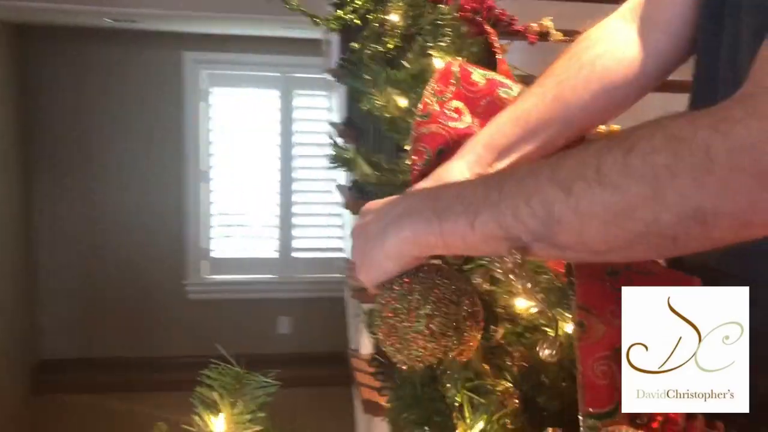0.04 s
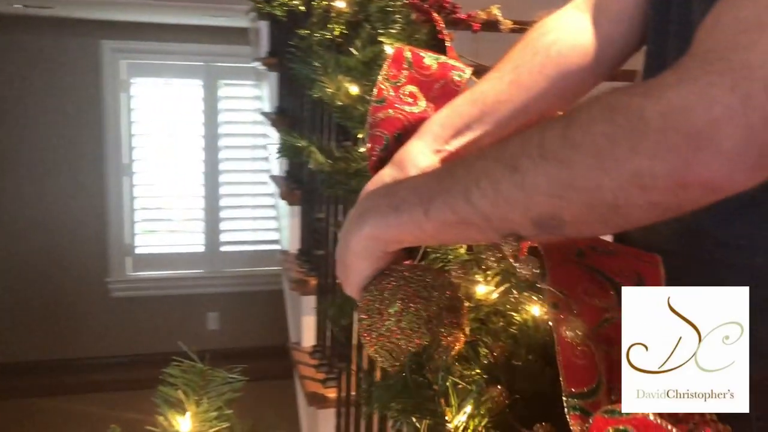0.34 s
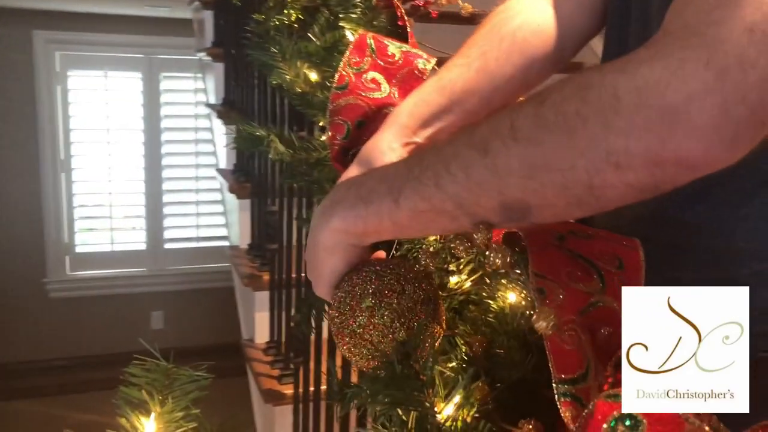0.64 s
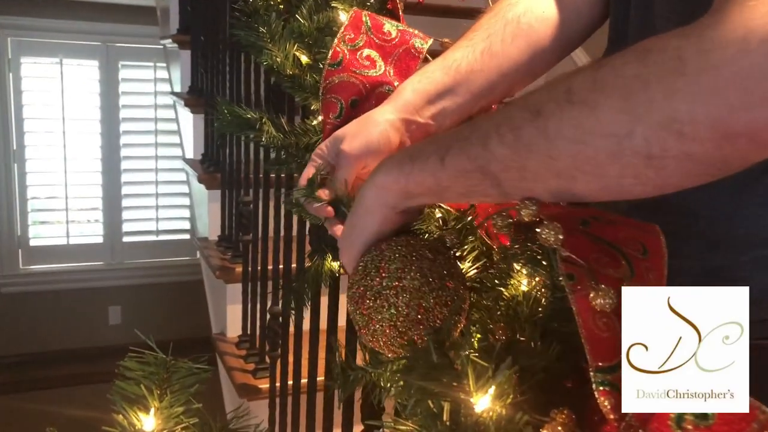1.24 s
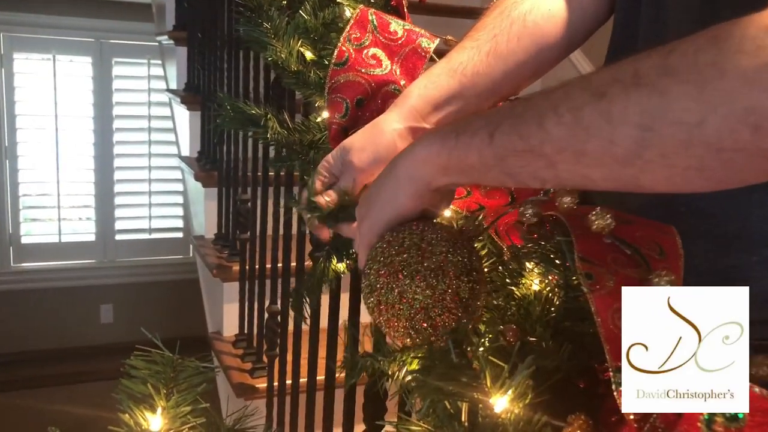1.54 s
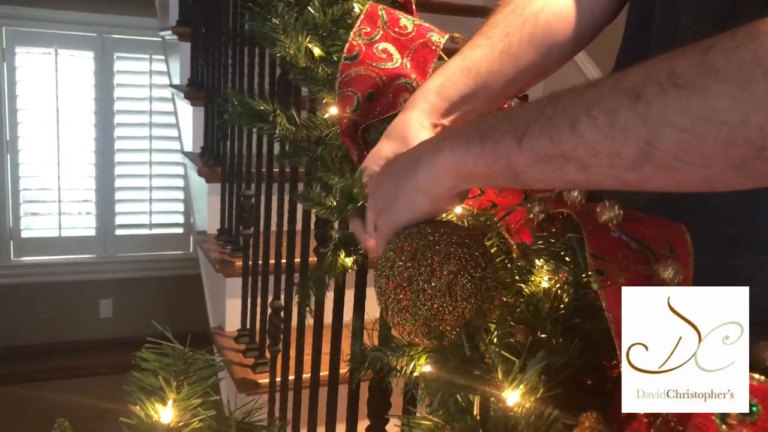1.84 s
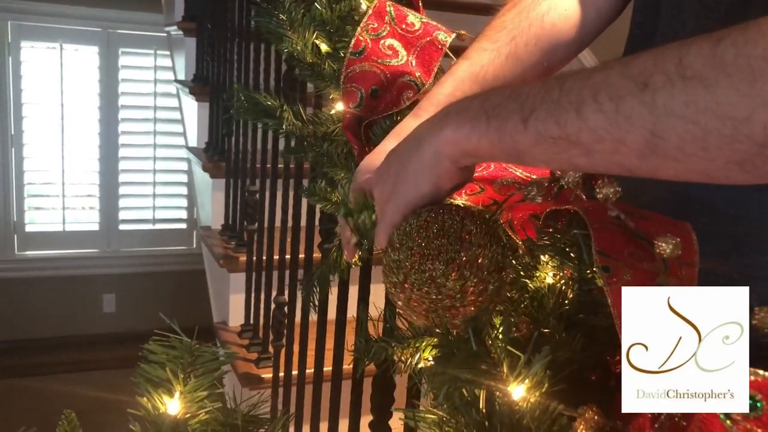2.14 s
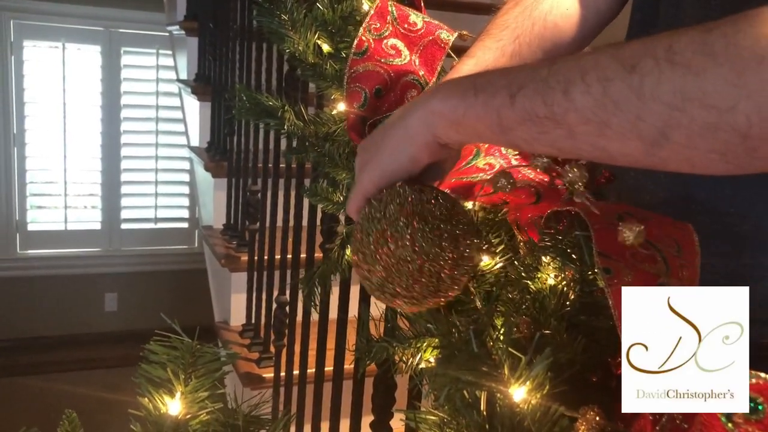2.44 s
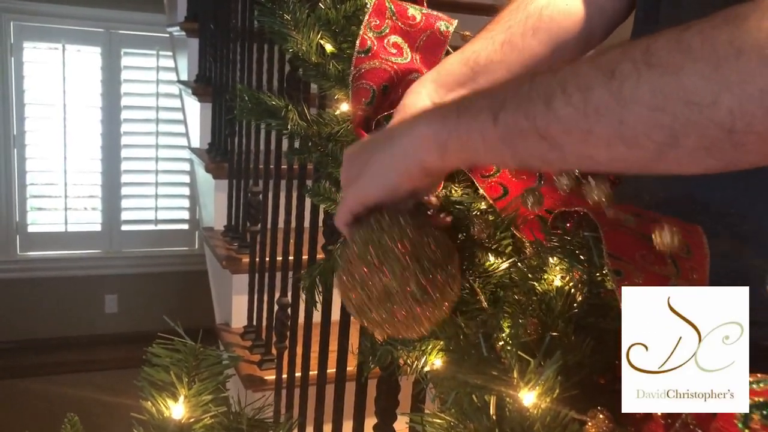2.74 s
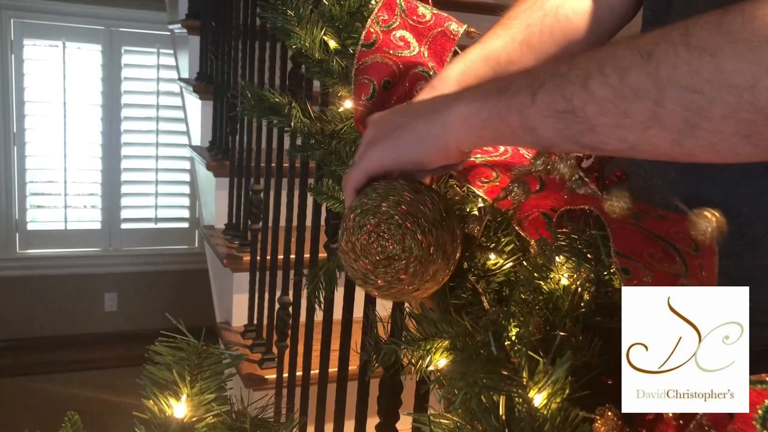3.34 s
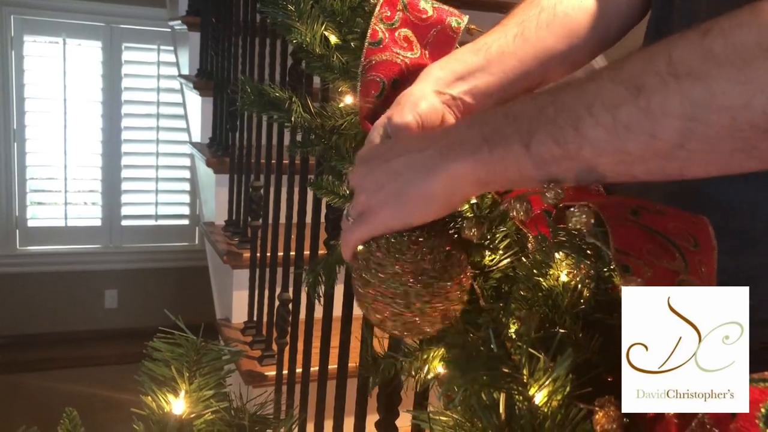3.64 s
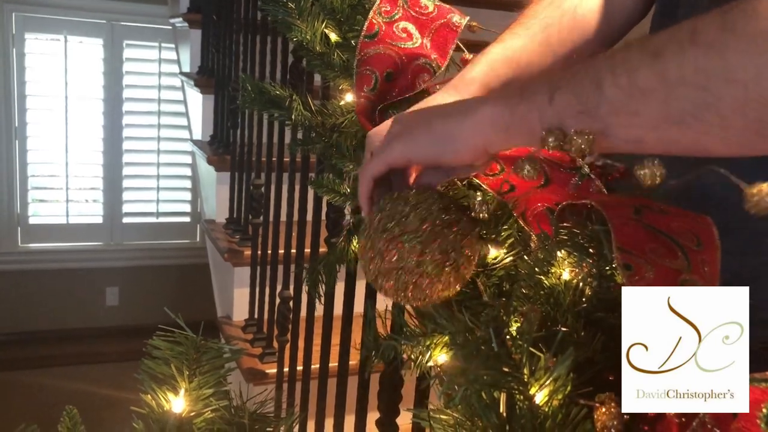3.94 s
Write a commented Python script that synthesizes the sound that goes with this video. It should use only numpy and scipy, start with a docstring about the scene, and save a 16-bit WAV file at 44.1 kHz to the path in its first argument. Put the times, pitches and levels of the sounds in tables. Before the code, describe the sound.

Plastic garland needles rustle in uneven bursts, with an ornament tapping lightly, in a quiet room.

```python
"""Decorating a garland

Hands work a glittery ball into an artificial garland on a staircase, in a quiet room.
Each push bends plastic needles that flick past each other and crackle. Stiff twigs snap free,
and the ball knocks lightly a few times. Under it lies the soft rumble and hum of the house."""
import sys
import numpy as np
from scipy import signal
from scipy.fft import rfft, irfft
from scipy.io import wavfile
from scipy.ndimage import uniform_filter1d

SR = 44100
rng = np.random.default_rng(int(sys.argv[2]) if len(sys.argv) > 2 else 0)


def wrap_up_sound(samples):
    """Save the sound to the file named by the first command line argument, as 16-bit audio."""
    columns = np.atleast_2d(samples).T
    # keep every value between -1 and 1, then stretch to whole-number steps
    tamed = np.clip(columns, -1, 1)
    steps = np.round(tamed * 32767).astype(np.int16)
    wavfile.write(sys.argv[1], SR, steps)


N = 4 * SR


def amp(db):
    """Turns decibels into a number to multiply a sound by."""
    return 10 ** (np.asarray(db) / 20)


def unit(x):
    """Scales a sound so its average power is 1."""
    return x / np.sqrt(np.mean(x ** 2) + 1e-20)


def peak_at(x, db=0):
    """Scales a sound so its highest peak is at the given level."""
    return amp(db) * x / abs(x).max()


def add(mix, start_s, sound):
    """Mixes a sound in at the given time."""
    part = mix[max(round(start_s * SR), 0):][:len(sound)]
    part += sound[:len(part)]


def colour(x, curve, size=4096):
    """Makes some pitches stronger and others weaker, following a curve of relative levels."""
    hz, db = np.transpose(curve)
    log_hz = np.log(abs(np.fft.fftfreq(size, 1 / SR)) + 1)
    log_gain = np.log(amp(np.interp(log_hz, np.log(hz), db)))
    response = np.exp(np.conj(signal.hilbert(log_gain)))  # rings after a hit, never before it
    taps = np.fft.ifft(response).real[:size // 2]
    return signal.oaconvolve(x, taps / np.linalg.norm(taps))[:len(x)]


def swell(peak_s, rise_s, fall_s, db):
    """The loudness of one hand movement: it builds to a peak and eases off."""
    t = np.arange(N) / SR
    distance = 2 * abs(t - peak_s) / np.where(t < peak_s, rise_s, fall_s)
    return amp(db) * np.exp(-distance ** 2.01 / 2)


# The tone of the ventilation: pitch_hz, relative_db
RUMBLE_TONE = [(24, -57), (38, -16), (60, -6.5), (100, -3.5), (130, 1.5), (190, -3.5), (290, 0.5),
               (400, -8.5), (600, -9.5), (1100, -15), (6000, -15), (16000, -21.5)]
# The notes the house hums: pitch_hz, level_db
HUM_NOTES = [(114, -70.5), (246, -66.5), (479, -79.5), (533, -76.5)]

def house(rumble_db=-56, waver_hz=2.8):
    """Ventilation rumbles steadily under a few humming notes that waver in pitch."""
    out = amp(rumble_db) * unit(colour(rng.standard_normal(N), RUMBLE_TONE))
    for hz, db in HUM_NOTES:
        waver = unit(uniform_filter1d(rng.standard_normal(N), SR // 20))
        phase = 2 * np.pi * np.cumsum(hz + waver_hz * waver) / SR
        out += amp(db) * unit(np.sin(phase))
    return out


def stairwell(x, low_fade_s=0.28, high_fade_s=0.33):
    """The walls send back scattered echoes, which drop by 60 dB over the fade times."""
    t = np.arange(SR // 2) / SR
    echoes = rng.standard_normal(len(t)) * (rng.random(len(t)) < 3000 / SR) * (t > .003)
    low = signal.sosfilt(signal.butter(2, 6000, fs=SR, output="sos"), echoes)
    high = (echoes - low) / 2
    tail = low * amp(-60 * t / low_fade_s) + high * amp(-60 * t / high_fade_s)
    return signal.oaconvolve(x, tail / np.linalg.norm(tail))[:N]


# The notes of the wire inside the garland: pitch_hz, relative_db
WIRE_NOTES = [(2675, -9), (3300, -16)]

def wire_spine(x, width_hz=60):
    """The garland's wire rings on faintly after whatever shakes it."""
    return sum(amp(db) * signal.lfilter(*signal.iirpeak(hz, hz / width_hz, fs=SR), x)
               for hz, db in WIRE_NOTES)


# The ball's nudges against the branches: start_s, peak_db, pitch_hz, fade_s
BALL_BUMPS = [(.309, -30, 2400, .002), (.461, -37, 2500, .004), (1.275, -49, 900, .006),
              (3.32, -42, 2200, .005), (3.696, -44, 1300, .01), (3.716, -48.5, 700, .016)]
# The notes of its hollow shell: pitch_hz, relative_db
SHELL_NOTES = [(560, -11.5), (950, -20), (1550, -18), (2650, -3), (3230, -4), (4000, 0), (4400, -2),
               (5300, -12), (6800, -11)]

def ball(tap_start_s=1.6181, tap_db=-18, ring_s=.00062):
    """The light ball bumps the branches dully, and once taps hard enough to ring its shell."""
    out, t = np.zeros(N), np.arange(3000) / SR
    for start_s, db, hz, fade_s in BALL_BUMPS:
        band = signal.butter(1, [hz / 2 ** .5, hz * 2 ** .25], "band", fs=SR, output="sos")
        burst = rng.standard_normal(len(t)) * np.exp(-t / fade_s)
        add(out, start_s, peak_at(signal.sosfilt(band, burst), db))
    shell = sum(amp(db) * np.sin(2 * np.pi * hz * t) for hz, db in SHELL_NOTES)
    tap = shell * t ** 2 * np.exp(-t / ring_s)
    add(out, tap_start_s, peak_at(tap, tap_db))
    return out


# The bright tone of ticks and fine crackle: pitch_hz, relative_db
CRACKLE_TONE = [(100, -64), (2000, -20), (4000, -1), (7000, 3), (8000, -3), (8600, 3), (9500, 0.5),
                (12500, 1.5), (15700, 4.5)]
# Ticks of single needle tips: start_s, relative_db
TIP_TICKS = [(.0445, -35), (.1945, -27), (.352, -33), (0.382, -33), (.4783, -32), (0.677, -31),
             (0.933, -29), (1.0415, -33), (1.41, -27), (1.468, -27), (1.5254, -37), (1.6841, -34),
             (1.8, -23), (1.888, -35.5), (2.5537, -36), (2.596, -36), (3.345, -28), (3.6092, -34)]

def needle_tips(gain_db=1, fade_s=0.0011):
    """A single needle tip ticks with a tiny burst of bright noise."""
    out, t = np.zeros(N), np.arange(1500) / SR
    for start_s, db in TIP_TICKS:
        burst = rng.standard_normal(len(t)) * np.exp(-t / fade_s)
        add(out, start_s, peak_at(colour(burst, CRACKLE_TONE), db + gain_db))
    return out


# The tone of the plastic needles and twigs: pitch_hz, relative_db
NEEDLE_TONE = [(100, -32.5), (1750, -27.5), (2200, -20.5), (2400, -14), (2660, -1.5), (2930, -6.5),
               (3290, 1.5), (3650, -1.5), (4200, -3.5), (4800, -10.5), (5400, -9), (6200, -13),
               (6850, -11.5), (8000, -19.5), (16000, -25)]
# Twigs snapping free: start_s, relative_db, pitch_hz
TWIG_SNAPS = [(0.0436, -28, 3140), (0.5262, -31, 3530), (0.5325, -31, 3360), (0.543, -31.5, 3820),
              (0.61, -34.5, 3350), (0.7542, -33, 3430), (0.816, -29.5, 3500), (0.891, -30.5, 2760),
              (0.9341, -27.5, 2640), (1.041, -33.5, 3400), (1.2077, -28.5, 2830), (1.2401, -26, 3570),
              (1.268, -23.5, 3070), (1.3618, -35.5, 3230), (1.3894, -27, 3240), (1.8004, -23.5, 3630),
              (1.8261, -24.5, 3250), (2.2628, -32.5, 3330), (2.3118, -27.5, 3320), (2.371, -29, 3340),
              (2.5485, -32.5, 3720), (2.8053, -25.5, 3746), (2.823, -31.5, 4160), (2.835, -28, 4130),
              (2.8522, -24.5, 4020), (2.8839, -27, 4080), (2.9125, -27.5, 3920), (2.9975, -30, 3330),
              (3.011, -26.5, 4220), (3.0922, -28.5, 3260), (3.3448, -25, 3200), (3.3587, -21, 2660),
              (3.529, -31, 3220), (3.6338, -19, 4000), (3.7125, -27, 3280), (3.7684, -29.5, 2630)]

def twigs(gain_db=-1, rise_s=0.0005, ring_s=0.0016, shake_s=0.0049):
    """A stiff twig lets go, rings for a moment and shakes its needles."""
    out, t = np.zeros(N), np.arange(1500) / SR
    rise = np.minimum(t / rise_s, 1) ** 2
    fade = np.exp(-np.maximum(t - 2 * rise_s, 0) / ring_s)
    for start_s, db, hz in TWIG_SNAPS:
        shake = colour(rng.standard_normal(len(t)) * np.exp(-t / shake_s), NEEDLE_TONE)
        ring = colour(rise * fade * np.sin(2 * np.pi * hz * t), NEEDLE_TONE)
        snap = peak_at(ring) + peak_at(shake)
        add(out, start_s, peak_at(snap, db + gain_db))
    return out


def flurry(per_s, spread_db=3, ring_s=.0018, sliding=.33):
    """The flickering power of random flicks, big and small, on top of smooth sliding."""
    strength = amp(spread_db * np.minimum(rng.exponential(1, N), 4))
    flicks = strength ** 2 * (rng.random(N) < per_s / SR)
    power = signal.lfilter([1], [1, -np.exp(-2 / (ring_s * SR))], flicks)  # each dies away quickly
    return power / power.mean() + sliding ** 2


def needles(sizes=6, flicks_per_s=400, alone_share=0.45):
    """Each size of needle rustles in its own pitch range, partly with the others, partly alone."""
    together = flurry(flicks_per_s)
    hz, centres_hz = np.fft.rfftfreq(N, 1 / SR), np.geomspace(2600, 7000, sizes)
    spectrum, out = rfft(rng.standard_normal(N)), np.zeros(N)
    for one_size in np.eye(sizes):
        band = irfft(spectrum * np.interp(hz, centres_hz, one_size), N)
        alone = flurry(flicks_per_s / 2)
        out += band * np.sqrt((1 - alone_share) * together + alone_share * alone)
    return out


# Bright scrapes of the needles: peak_s, rise_s, fall_s, level_db
NEEDLE_SCRAPES = [(.84, .03, .04, -56), (2.85, 0.05, 0.17, -48.5), (3.96, 0.05, 0.11, -50)]

def scrapes(band_hz=(4020, 5770)):
    """Needles scrape with a thin, high rustle that swells and fades."""
    band = signal.butter(2, band_hz, "band", fs=SR, output="sos")
    rustle = unit(signal.sosfilt(band, needles()))
    return rustle * sum(swell(*row) for row in NEEDLE_SCRAPES)


# The fine crackle that carries on between pushes: time_s, relative_db
LINGERING_CRACKLE = [(0, -65), (1.0, -59), (1.6, -47), (2.6, -47), (2.72, -46), (3.0, -58), (3.7, -55),
                     (3.82, -53)]
# Pushes of the hands: peak_s, rise_s, fall_s, relative_db, extra_crackle_db
HAND_PUSHES = [(0.054, 0.24, 0.11, -48, -7), (0.144, 0.024, 0.038, -44.5, -10),
               (0.194, 0.029, 0.092, -38.5, -5), (0.245, 0.026, 0.15, -36.5, -3.5),
               (0.477, 0.05, 0.076, -43.5, -4), (0.674, 0.042, 0.049, -46.5, -2),
               (0.754, 0.019, 0.023, -37, -10), (0.784, 0.015, 0.099, -42.5, -1.5),
               (0.934, 0.089, 0.086, -43.5, -7), (1.047, 0.0092, 0.14, -48, 2.5),
               (1.276, 0.069, 0.049, -38, 0), (1.473, 0.12, 0.096, -39, -3), (1.629, 0.082, 0.1, -41, 0),
               (1.698, 0.035, 0.15, -38, -2), (1.954, 0.043, 0.036, -40, -5),
               (2.036, 0.035, 0.026, -45, -12), (2.081, 0.031, 0.019, -42, -15),
               (2.193, 0.038, 0.082, -48.5, 4), (2.272, 0.036, 0.14, -45.5, 2),
               (2.405, 0.082, 0.027, -42, 5.5), (2.553, 0.1, 0.11, -54, 12.5),
               (2.81, 0.0054, 0.11, -49.5, -18), (2.856, 0.0076, 0.061, -38.5, 0.5),
               (2.934, 0.035, 0.021, -40.5, 2.5), (3.014, 0.094, 0.029, -44.5, 2),
               (3.074, 0.055, 0.075, -39, -1), (3.151, 0.021, 0.071, -41.5, -2),
               (3.272, 0.12, 0.13, -44, -1.5), (3.349, 0.026, 0.12, -35, -9), (3.451, 0.015, 0.32, -46, 3),
               (3.624, 0.074, 0.053, -37.5, -7), (3.749, 0.18, 0.059, -38.5, -5),
               (3.911, 0.088, 0.069, -42.5, -10), (3.954, 0.028, 0.079, -41, -8)]

def pushed_garland(resting_db=-56.5, flick_gain_db=-1.85, crackle_gain_db=-8.5):
    """Each push bends needles so they flick and crackle. Under resting hands they still stir."""
    flick_power = np.full(N, amp(resting_db) ** 2)
    crackle_power = amp(np.interp(np.arange(N) / SR, *np.transpose(LINGERING_CRACKLE))) ** 2
    for peak_s, rise_s, fall_s, db, extra_crackle_db in HAND_PUSHES:
        push_power = swell(peak_s, rise_s, fall_s, db) ** 2
        flick_power += push_power
        crackle_power += push_power * amp(extra_crackle_db) ** 2
    flicks = colour(needles() * np.sqrt(flick_power), NEEDLE_TONE)
    hiss = rng.standard_normal(N)
    flicker = flurry(per_s=850, spread_db=3.5, ring_s=.0004)
    crackle = colour(hiss * np.sqrt(crackle_power * flicker), CRACKLE_TONE)
    return amp(flick_gain_db) * flicks + amp(crackle_gain_db) * crackle


def scene(echo_db=-13.5):
    """Mixes the garland, the ball, their echoes and the house into one channel."""
    garland = pushed_garland() + scrapes() + twigs() + needle_tips()
    near = garland + wire_spine(garland) + ball()
    return (near + amp(echo_db) * stairwell(near) + house())[None]


def record(dry, cutoff_hz=15830):
    """Takes away the very highest pitches."""
    low_pass = signal.firwin(1023, cutoff_hz, window=("kaiser", 8), fs=SR)
    return signal.oaconvolve(dry, low_pass[None], "same")


dry = scene()
out = record(dry)
wrap_up_sound(out)
```